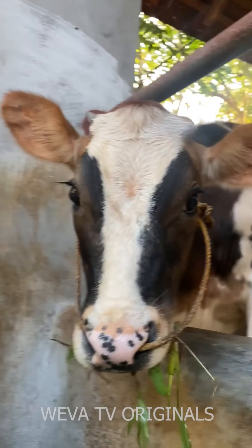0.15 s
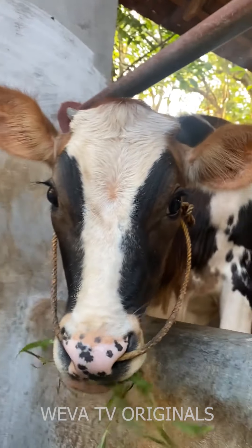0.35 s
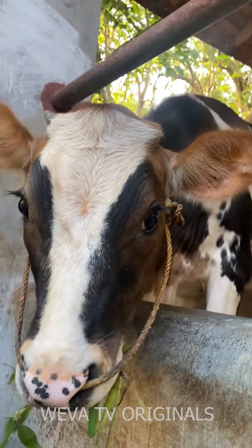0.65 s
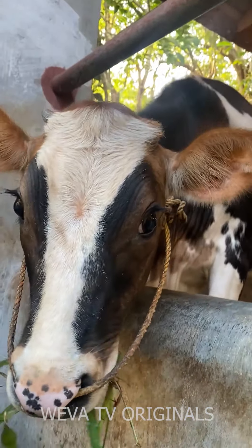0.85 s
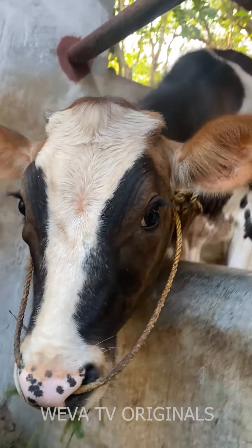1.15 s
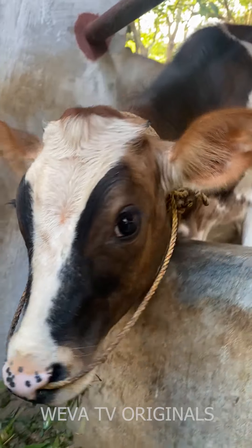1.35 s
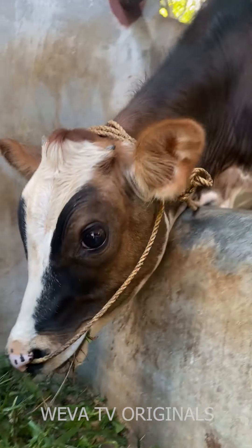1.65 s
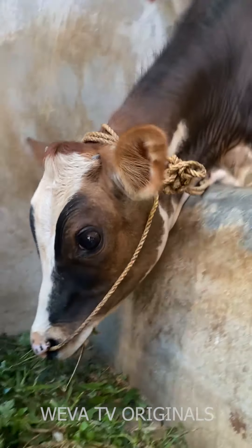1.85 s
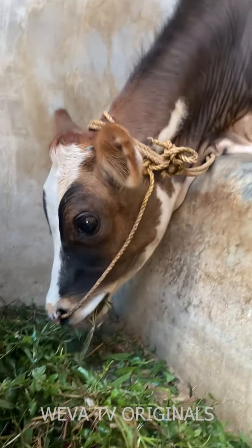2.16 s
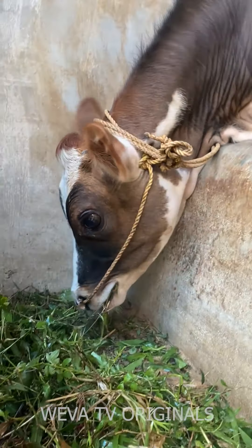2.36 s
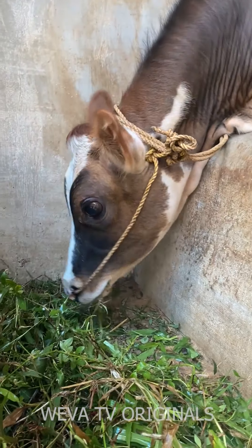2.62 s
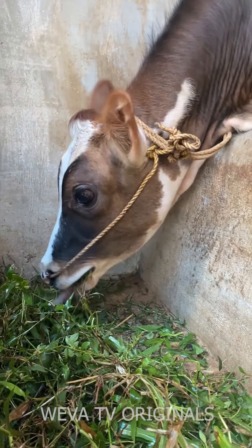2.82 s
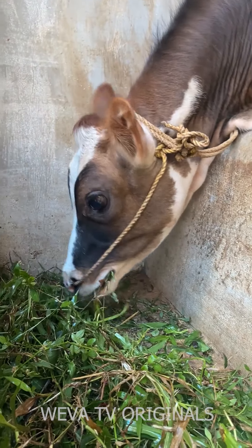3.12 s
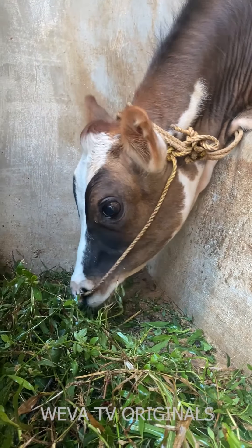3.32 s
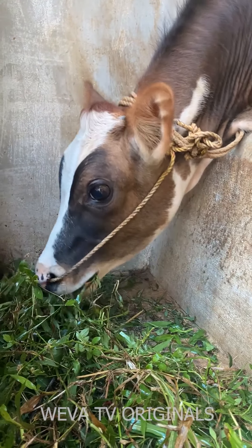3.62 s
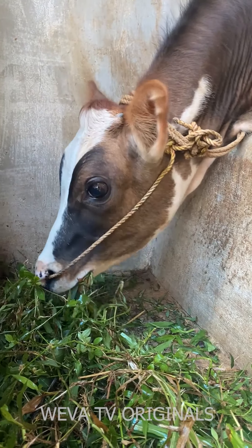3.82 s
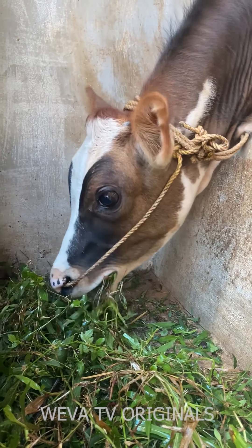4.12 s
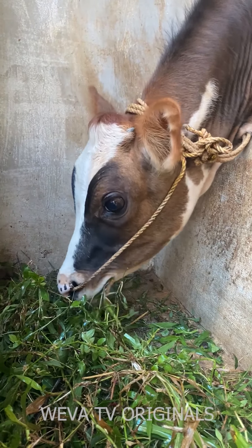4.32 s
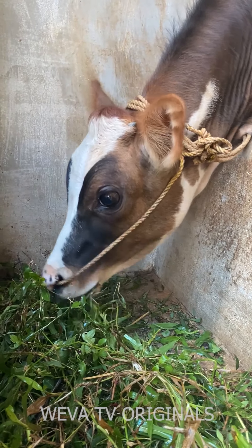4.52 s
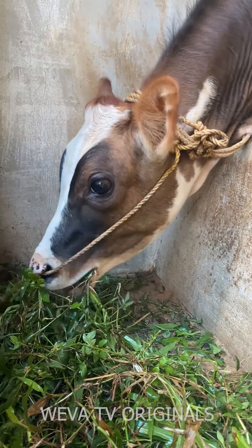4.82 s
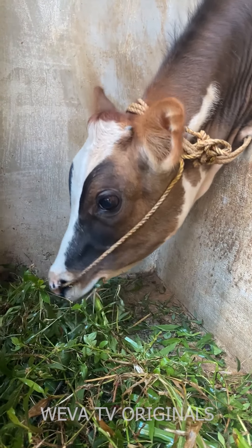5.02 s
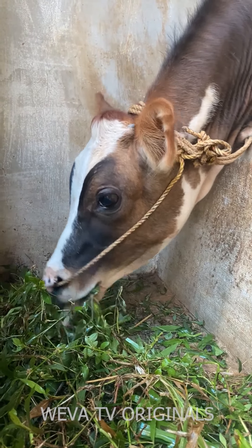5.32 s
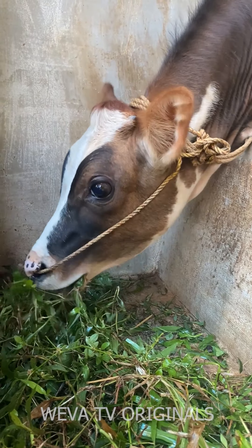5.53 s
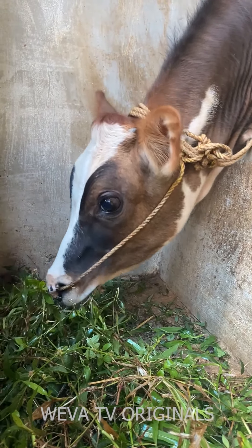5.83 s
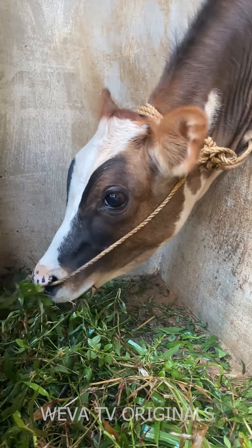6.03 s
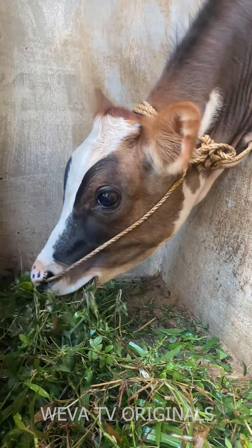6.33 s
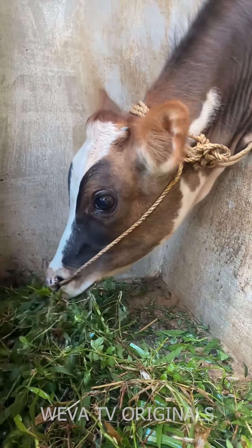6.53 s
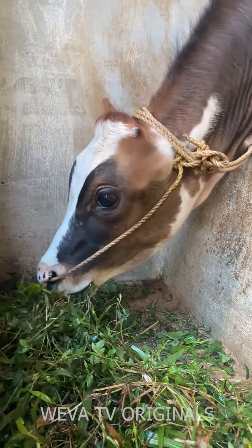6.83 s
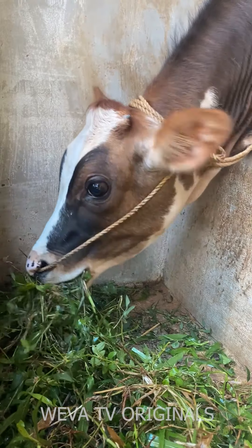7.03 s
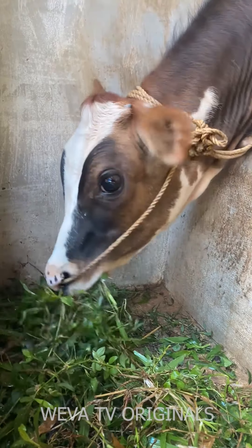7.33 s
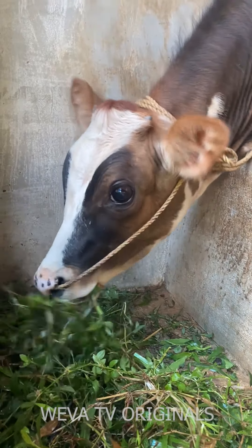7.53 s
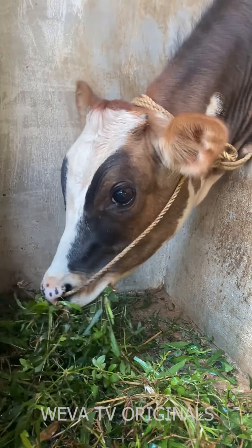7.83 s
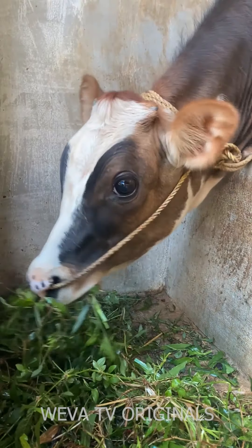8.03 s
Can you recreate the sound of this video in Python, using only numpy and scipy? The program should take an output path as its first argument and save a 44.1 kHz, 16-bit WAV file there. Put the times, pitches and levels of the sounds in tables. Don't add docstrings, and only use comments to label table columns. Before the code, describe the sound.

A calf grinds and tears fresh grass very close by, with wet crunches, stem snaps and leafy rustle over a low vehicle rumble that swells and fades.

```python
import sys
import numpy as np
from scipy import signal
from scipy.fft import rfft, irfft, next_fast_len
from scipy.io import wavfile
from scipy.ndimage import uniform_filter1d

SR = 44100
rng = np.random.default_rng(int(sys.argv[2]) if len(sys.argv) > 2 else 0)


def generate_wav(signal):
    frames = np.transpose(np.atleast_2d(signal))
    scaled = np.clip(frames, -1, 1) * 32767
    pcm = np.round(scaled).astype(np.int16)
    wavfile.write(sys.argv[1], SR, pcm)


def volts_from_decibels(level):
    exponent = np.asarray(level, float) / 20
    return 10 ** exponent


N = 359856


def evened(x):
    return x / np.sqrt(np.mean(x ** 2) + 1e-20)


def read(points, hz):
    f, value = np.transpose(points)
    return np.interp(np.log(hz + 1), np.log(f + 1), value)


def curve(rows, count=1):
    rows = np.array(rows)
    return np.interp(np.arange(N) / SR, rows[:, 0], rows[:, count])


def add(mix, s, sound):
    part = mix[round(s * SR):][:len(sound)]
    part += sound[:len(part)]


def sweep(hz):
    return np.sin(2 * np.pi * np.cumsum(hz) / SR)


# (frequency [Hz], phase [rad])
PORT_LEAD = [(0, 0), (300, 0), (860, -.4), (1460, .5), (1980, .1), (2760, .9), (3960, .9), (4910, 1.6),
             (5600, 1.6), (7900, 2.3), (10000, 3.14), (12000, 3.9), (15900, 5.3)]


def colour(x, points, turn=0):
    size = next_fast_len(N + 4096)
    hz = np.fft.rfftfreq(size, 1 / SR)
    response = volts_from_decibels(read(points, hz)) * np.exp(1j * turn * read(PORT_LEAD, hz))
    return irfft(rfft(x, size) * response, size)[..., :N]


def ring(x, hz, width):
    return signal.lfilter(*signal.iirpeak(hz, hz / width, SR), x)


def resonate(x, hz, width):
    turn = np.exp(2j * np.pi * np.cumsum(hz * np.ones(len(x))) / SR)
    r = np.exp(-np.pi * width / SR)
    return 2 * (turn * signal.lfilter([1 - r], [1, -r], x / turn)).real


def drift(per_s):
    knots = rng.standard_normal(1200)
    return np.interp(np.arange(N) / SR * per_s, np.arange(1200), knots)


def crackle(per_s, spread_db, smear_s, clump_db):
    size = volts_from_decibels(spread_db * np.minimum(rng.exponential(1, N), 5) + clump_db * drift(40))
    clicks = size * (rng.random(N) < per_s / SR)
    puff = signal.lfilter([1], [1, -np.exp(-1 / (smear_s * SR))], clicks ** 2)
    return evened(np.sqrt(puff) * rng.standard_normal(N))


def strokes(rows, peaks_db, least_s, share, roundness, rest_db):
    t = np.arange(0, N / SR + .01, .002)
    late = t - rows[:, :1]
    build = np.maximum(rows[:, 1:2], .02)
    span = np.where(late < 0, build, least_s + share * build)
    power = volts_from_decibels(peaks_db[:, None] - 20 * (abs(late) / span) ** roundness) ** 2
    return np.interp(np.arange(N) / SR, t, np.sqrt(power.sum(0) + volts_from_decibels(rest_db) ** 2))


def thuds(rows, gain_db, t60, rise_s, length=2600):
    out, t = np.zeros(N), np.arange(length) / SR
    for s, db, hz in rows:
        decay = volts_from_decibels(db + gain_db - 60 * t / t60)
        add(out, s, decay * np.sin(2 * np.pi * hz * t) * np.minimum(t / rise_s, 1))
    return out


def hisses(rows, gain_db, t60, hz, width):
    out, t = np.zeros(N), np.arange(2600) / SR
    for s, db in rows:
        noise = rng.standard_normal(len(t))
        add(out, s, volts_from_decibels(db + gain_db - 60 * t / t60) * evened(ring(ring(noise, hz, width), hz, width)))
    return out


# (peak time [s], build-up [s], grinding level [dB], stem crunch re grinding [dB])
BITES = [(0.078, 0.16, -42.5, -10.5), (0.48, 0.23, -57.5, -1.5), (0.708, 0.14, -46.5, -6),
         (1.001, 0.052, -54, -20), (1.261, 0.54, -53, 0), (1.58, 0.21, -54, -4), (1.82, 0.17, -44, -9.5),
         (2.2, 0.39, -49, -7.5), (2.339, 0.036, -39.5, -16.5), (2.511, 0.28, -48.0, -8),
         (2.811, 0.14, -48, -11), (3.06, 0.13, -48.5, -7.5), (3.289, 0.25, -46, -7.5),
         (3.462, 0.08, -50.5, -7), (3.8, 0.93, -58, -35), (4.14, 0.058, -50.5, -2.5),
         (4.394, 0.25, -41.5, -7), (4.789, 0.31, -54, -2), (5.092, 0.16, -42, -11),
         (5.31, 0.097, -45.5, -9), (5.39, 1, -56, -33), (6.0, 0.19, -56.5, -1), (6.37, 0.31, -54.5, -1.5),
         (6.46, 0.077, -50.5, -0.5), (6.579, 0.041, -51, -2.5), (7.03, 0.71, -53, -4),
         (7.27, 0.085, -50, 0), (7.782, 0.55, -55.5, -0.5), (7.955, 0.073, -46.5, -3.5),
         (8.23, 0.14, -40, -1.5)]


def bite_gain(crunch, rest_db):
    rows = np.array(BITES)
    peaks_db = rows[:, 2] + crunch * rows[:, 3]
    return strokes(rows, peaks_db, least_s=0.012, share=0.9, roundness=1.66, rest_db=rest_db)


# (frequency [Hz], width [Hz], level [dB])
JAW_MODES = [(240, 107, -0.5), (330.6, 12.9, 1), (420, 73, -4.5), (492, 3.3, -3.5), (546, 114, -0.5),
             (609.4, 58, -0.5), (635.7, 18.6, -3.5), (967, 11, -5)]
# (time [s], peak level [dB], frequency [Hz])
KNOCKS = [(0.07, -28, 312), (0.495, -32, 543), (0.995, -30.5, 297), (1.289, -25.5, 575), (1.295, -33, 280),
          (1.721, -25.5, 426), (1.788, -25.5, 368), (2.127, -33.5, 518), (2.296, -33.5, 600),
          (2.309, -27, 585), (2.34, -39, 600), (2.424, -32.5, 427), (2.501, -31.5, 352), (2.815, -37, 610),
          (3.203, -32.5, 420), (3.305, -33, 563), (3.438, -31.5, 614), (4.341, -24, 403), (4.414, -23, 333),
          (4.724, -35, 466), (5.003, -29, 356), (5.264, -28.5, 483), (6.014, -33, 618), (7.956, -30, 416)]


def molars():
    slips = crackle(per_s=280, spread_db=2.5, smear_s=0.0041, clump_db=-1.0)
    modes = sum((-1) ** k * volts_from_decibels(db) * evened(ring(slips, hz, width))
                for k, (hz, width, db) in enumerate(JAW_MODES))
    mouth_hz = uniform_filter1d(curve(KNOCKS, count=2), size=900)
    body = 1.64 * evened(modes) + 0.29 * evened(resonate(slips, mouth_hz, 100))
    body = colour(body, [(170, -6.0), (260, 2.0), (680, 2.0), (850, -7), (1500, -18.5), (20000, -21)])
    return volts_from_decibels(-0.5) * bite_gain(crunch=0, rest_db=-68) * evened(body)


def knocks():
    return thuds(KNOCKS, gain_db=-3.5, t60=0.06, rise_s=0.0027)


# (time [s], peak level [dB], frequency [Hz])
TAPS = [(0.121, -32, 267), (0.594, -36, 481), (0.666, -37, 528), (0.694, -31.5, 494), (0.804, -32, 500),
        (1.243, -36, 504), (1.517, -37, 341), (1.569, -33, 338), (1.626, -38.5, 438), (1.663, -37, 430),
        (1.814, -32.5, 407), (1.836, -35.5, 445), (1.885, -30, 408), (2.187, -37.5, 277),
        (3.012, -43.5, 456), (3.232, -32.5, 321), (4.277, -30, 465), (4.316, -25.5, 332), (4.449, -38, 472),
        (4.773, -33, 482), (4.828, -35.5, 571), (5.06, -37.5, 563), (5.078, -26, 328), (5.44, -45, 335),
        (5.529, -39, 540), (6.09, -39.5, 574), (6.354, -34.5, 332), (6.579, -37, 393), (7.197, -37.5, 538),
        (7.226, -48, 558), (7.251, -30.5, 638), (7.267, -37, 617)]


def taps():
    return thuds(TAPS, gain_db=-5.0, t60=0.079, rise_s=0.0025)


# (peak time [s], build-up [s], rustle level [dB])
PULLS = [(0.13, 0.017, -57.5), (0.33, 0.1, -64), (0.79, 0.27, -66.5), (1.03, 0.28, -66), (1.33, 0.18, -58),
         (1.65, 0.078, -65.5), (1.91, 0.073, -60.5), (2.26, 0.075, -63), (2.58, 1, -67.5),
         (2.97, 0.92, -68), (3.3, 0.52, -61.5), (3.601, 0.23, -59.5), (3.878, 0.51, -57),
         (4.17, 0.34, -60.5), (4.38, 0.12, -69), (4.7, 1, -61.5), (5.1, 0.46, -63), (5.492, 0.16, -56.5),
         (5.7, 0.26, -59), (6.02, 0.14, -68), (6.29, 0.28, -58.5), (6.54, 0.94, -57), (7.06, 0.54, -54),
         (7.32, 0.26, -59.5), (7.613, 0.29, -54.5), (7.9, 0.93, -61), (8.23, 0.27, -58.5)]


def pull_gain(gain_db, rest_db):
    rows = np.array(PULLS)
    return strokes(rows, rows[:, 2] + gain_db, least_s=0.035, share=0.14, roundness=2.17, rest_db=rest_db)


# (frequency [Hz], level [dB])
STEM_SPECTRUM = [(500, -15), (800, -7), (1200, -6), (1600, -1), (2300, -8.5), (3300, -6), (4300, -16.5),
                 (6000, -11.5), (16000, -16)]
# (frequency [Hz], width [Hz], level [dB])
TROUGH_MODES = [(1280, 34, -3), (1580, 150, -4.5), (2180, 200, 4.5), (3550, 340, -11), (4120, 500, 15),
                (4900, 80, -32)]


def stems():
    crunch = crackle(per_s=1400, spread_db=2.4, smear_s=.001, clump_db=2.0)
    juice = sum(resonate(crunch, hz * (1 + .15 * drift(9)), 120) for hz in (1000, 2500, 5200))
    trough = sum(volts_from_decibels(db) * evened(ring(crunch, hz, width)) for hz, width, db in TROUGH_MODES)
    sound = colour(crunch + 0.4 * evened(juice) + 0.35 * evened(trough), STEM_SPECTRUM)
    gain = np.hypot(bite_gain(crunch=1, rest_db=-80), pull_gain(gain_db=-2.5, rest_db=-80))
    return volts_from_decibels(0.5) * gain * evened(sound)


# (time [s], peak level [dB], ring [Hz], bright crack level [dB])
SNAPS = [(0.013, -37, 1184, -62), (0.07, -43, 2500, -65), (0.115, -35, 1305, -41), (0.14, -32, 1050, -59),
         (0.6, -40, 1790, -74), (0.69, -41.5, 3480, -66), (0.752, -33, 1275, -73),
         (0.804, -29, 1865, -49.5), (1.093, -43.5, 2050, -85), (1.244, -39, 1330, -44),
         (1.289, -25.5, 1015, -53), (1.624, -38, 1255, -55), (2.239, -41, 1230, -49),
         (2.175, -41, 2140, -66), (2.499, -39.5, 2970, -70), (2.518, -35, 2860, -73),
         (2.737, -38, 705, -76), (3.07, -44.5, 2700, -67), (3.224, -38.5, 3480, -63),
         (3.258, -40, 3200, -65), (3.301, -31.5, 1900, -44), (3.338, -38.5, 4280, -63),
         (4.334, -39.5, 1860, -63), (4.343, -35.5, 2830, -62), (4.378, -35, 4730, -41),
         (4.415, -32.5, 880, -43.5), (4.723, -38, 940, -53), (5.049, -40.5, 2910, -67),
         (5.113, -41, 3620, -63), (5.083, -35.5, 4000, -70), (6.015, -38.5, 940, -67),
         (6.451, -38.5, 1180, -51), (7.252, -39.5, 940, -71), (7.306, -33.5, 1680, -59),
         (7.428, -41, 1330, -62), (7.919, -39, 2370, -78), (7.95, -24, 1134, -38), (8.122, -37, 820, -71)]


def snaps():
    out, t = np.zeros(N), np.arange(2600) / SR
    for s, db, hz, crack_db in SNAPS:
        noise = rng.standard_normal(len(t))
        ping = volts_from_decibels(db - 6.5 - 60 * t / .036) * np.sin(2 * np.pi * hz * t)
        decay = volts_from_decibels(-60 * t / .026) + .25 * volts_from_decibels(-60 * t / .08)
        burst = volts_from_decibels(db - 8) * evened(ring(noise, 1.1 * hz, 2000)) * decay
        crack = volts_from_decibels(crack_db + 6.0 - 60 * t / 0.035) * np.diff(noise, prepend=0)
        add(out, s, (ping + burst + crack) * np.minimum(t / 0.0003, 1))
    return out


# (time [s], peak level [dB], ring [Hz])
POPS = [(0.02, -30, 1400), (0.045, -34.5, 1240), (0.213, -45.5, 1330), (0.356, -45, 1500),
        (0.412, -40.5, 1040), (0.433, -40, 1590), (0.497, -39.5, 1280), (0.613, -41, 1150),
        (0.638, -35, 1340), (0.652, -42, 1450), (0.664, -36.5, 1390), (0.677, -39, 1360),
        (0.727, -45, 1063), (1.009, -42, 1640), (1.717, -36.5, 1235), (1.728, -40, 1930),
        (1.785, -43, 1800), (1.849, -43, 3140), (1.886, -33, 820), (1.917, -42.5, 2360), (2.129, -41, 2180),
        (2.169, -48, 2130), (2.34, -40, 1500), (2.52, -32.5, 1580), (2.658, -46, 4070), (3.018, -38, 1010),
        (3.224, -45.5, 1950), (3.458, -42, 1380), (4.1, -49, 4340), (4.113, -39, 2250), (4.512, -35, 874),
        (5.023, -43, 960), (5.044, -39, 1504), (5.081, -34, 957), (5.111, -45, 816), (5.163, -40, 1000),
        (5.439, -47, 920), (5.684, -47, 961), (5.684, -43, 2700), (6.312, -42, 1820), (6.421, -43, 1510),
        (6.489, -40, 1490), (6.51, -40, 1400), (6.553, -43, 1500), (6.58, -44.5, 880), (6.718, -39, 4330),
        (6.769, -47.5, 830), (7.213, -43, 1450), (7.225, -43, 1540), (7.253, -31, 1580), (7.278, -38, 1505),
        (7.306, -37.5, 1580), (7.39, -56.5, 1330), (7.427, -35, 1417), (7.484, -43.5, 1770),
        (7.529, -52, 1830), (7.843, -44, 1160), (8.132, -40, 2340)]


def pops():
    out, t = np.zeros(N), np.arange(2600) / SR
    for s, db, hz in POPS:
        puff = evened(ring(rng.standard_normal(len(t)), hz, 800))
        tone = np.sin(2 * np.pi * hz * t) + .6 * puff
        add(out, s, volts_from_decibels(db - 3 - 60 * t / .028) * tone * np.minimum(t / 0.0014, 1))
    return out


# (start [s], length [s], level # [dB], ring [Hz], width
# [Hz])
RASPS = [(0.61, 0.12, -51, 1350, 694), (1.003, 0.034, -53, 5200, 1500), (1.089, 0.04, -50.5, 2390, 900),
         (1.304, 0.011, -37.5, 3170, 151), (2.12, 0.08, -61, 2200, 500), (2.238, .045, -59.5, 2480, 500),
         (1.718, 0.032, -58, 1280, 100), (3.011, 0.041, -56.5, 1013, 90), (3.144, .035, -61, 1540, 120),
         (3.293, 0.023, -42.5, 4400, 1800), (2.797, .06, -52, 600, 350), (3.299, 0.017, -51, 3200, 300),
         (3.472, .014, -53.5, 4100, 1200), (4.099, 0.093, -51, 4400, 5000),
         (4.116, 0.054, -53.5, 1460, 150), (4.594, .05, -55, 920, 199), (4.714, .15, -57, 914, 150),
         (4.714, .16, -49, 498, 150), (2.306, 0.071, -56, 1216, 110), (5.905, .03, -54.5, 750, 600),
         (5.247, 0.15, -51, 524, 300), (5.416, 0.089, -52.5, 335, 40.7), (7.647, 0.077, -58, 995, 80),
         (7.658, 0.22, -53, 494, 60), (7.717, .075, -61.5, 1750, 100), (7.948, .018, -45.5, 2380, 600),
         (7.953, 0.047, -50, 1150, 200), (7.945, 0.017, -41, 4370, 3000)]


def rasps():
    out = np.zeros(N)
    grit = crackle(per_s=1500, spread_db=2.0, smear_s=.001, clump_db=1.0)
    for s, length, db, hz, width in RASPS:
        part = grit[round(s * SR):][:round(length * SR)]
        drag = evened(ring(ring(part, hz, width), hz, width))
        add(out, s, volts_from_decibels(db) * drag * signal.windows.tukey(len(part), .3))
    return out


# (time [s], level [dB])
SLIPS = [
    (4.247, -46.5),
    (4.28, -40.5),
    (4.296, -40),
    (4.313, -43),
    (4.347, -43),
    (4.375, -37.5),
    (4.391, -42),
    (4.407, -37.5),
    (4.412, -36.5),
]


def squeak():
    out, t = np.zeros(N), np.arange(1200) / SR
    for s, db in SLIPS:
        ping_hz = 4330 * (1 + 0.018 * rng.standard_normal())
        tick = evened(ring(rng.standard_normal(len(t)), 3500, 6000))
        add(out, s, volts_from_decibels(db - 60 * t / 0.031) * (np.sin(2 * np.pi * ping_hz * t) + tick))
    return out


# (frequency [Hz], level [dB])
LEAF_SPECTRUM = [(1500, -22), (3000, -9), (4500, -3), (5500, 0), (7000, -.5), (8500, -2), (9500, -2),
                 (10500, -4), (13500, -3), (15500, -5.5)]


def leaves():
    ticks = crackle(per_s=2500, spread_db=3.0, smear_s=.001, clump_db=2.0)
    springs = crackle(per_s=45, spread_db=3.0, smear_s=.006, clump_db=0)
    rustle = evened(colour(ticks + 0.4 * springs, LEAF_SPECTRUM))
    return volts_from_decibels(7.5 + 3.0 * drift(12)) * pull_gain(gain_db=0, rest_db=-76) * rustle


# (time [s], peak level [dB])
LEAF_TICKS = [(0.0727, -50), (0.7158, -45.5), (1.009, -39.5), (1.322, -38.5), (1.884, -46), (1.9946, -50),
              (5.113, -43), (5.684, -44), (5.062, -45), (5.767, -50), (7.1222, -39), (7.4988, -45)]


def leaf_ticks():
    return hisses(LEAF_TICKS, gain_db=1.5, t60=.036, hz=6200, width=8000)


# (time [s], peak level [dB])
FLICKS = [(0.4239, -53), (0.7654, -51), (0.805, -49.5), (2.2206, -45), (2.378, -55), (2.4983, -53),
          (2.7187, -61), (2.7906, -57), (3.004, -50), (3.473, -57), (3.8026, -48), (4.1003, -47),
          (4.613, -54), (5.079, -55), (7.5118, -36.5)]


def flicks():
    return hisses(FLICKS, gain_db=2.5, t60=0.043, hz=14000, width=12000)


# (start [s], length [s], top pitch [Hz], level [dB], width [Hz])
BREATHS = [
    (0.238, 0.34, 1444, -69, 400),
    (0.867, 0.32, 1440, -66.5, 350),
    (2.295, 0.31, 1473, -68.5, 200),
    (2.797, 0.26, 1490, -71, 45),
    (3.4, 0.23, 1430, -66.5, 60),
    (4.094, 0.234, 1500, -69, 110),
    (4.62, 0.31, 1554, -69.5, 80),
    (5.811, 0.198, 1460, -68.5, 40),
]


def nostrils():
    out = np.zeros(N)
    for s, length, hz, db, width in BREATHS:
        u = np.arange(0, length, 1 / SR) / length
        pitch = hz * (1 - .15 * abs(2 * u - 1) ** 4 - .05 * (u - .5))
        air = resonate(resonate(rng.standard_normal(len(u)), pitch, width), pitch, width)
        whistle = evened(evened(air) + .7 * 150 / width * sweep(pitch))
        add(out, s, volts_from_decibels(db + 7.0 + 1.5 * u) * whistle * signal.windows.tukey(len(u), .3))
    return out


# (time [s], level [dB])
ENGINE_LEVEL = [
    (2.5, -48.5),
    (3.7, -49.5),
    (4.4, -43.5),
    (5, -39),
    (5.8, -46.5),
    (6.5, -44),
    (7.3, -48.5),
]
# (time [s], firing cycle [Hz])
ENGINE_SPEED = [
    (2.5, 16.1),
    (3.4, 16.3),
    (4.1, 16.8),
    (5.5, 16.5),
    (6.2, 15.6),
    (7.3, 14.7),
]
# (multiple of the cycle, level abreast [dB], change as the exhaust swings round [dB/s])
ENGINE_ORDERS = [(3, -24, 1), (4, -20.5, -3.5), (5, -3, 1), (7, -15.5, 6), (8, -1, -0.3), (10, -11.5, -3.5)]


def vehicle():
    t = np.arange(N) / SR
    turns = 2 * np.pi * np.cumsum(uniform_filter1d(curve(ENGINE_SPEED), size=SR // 4)) / SR
    fade = np.interp(t, [2.3, 2.7, 7.1, 7.5], [0, 1, 1, 0])
    drone = np.zeros(N)
    for order, db, swing_db in ENGINE_ORDERS:
        level_db = db + swing_db * (t - 4.7) + 3.3 * drift(8.7)
        drone += volts_from_decibels(level_db) * np.sin(order * turns + 0.62 * drift(5))
    return fade * volts_from_decibels(curve(ENGINE_LEVEL) + 2.0) * drone


# (time [s], frequency [Hz], level [dB])
IDLE = [
    (0, 40.56, -68),
    (2, 41, -45),
    (3.6, 45.1, -61),
    (4.4, 42.4, -68.5),
    (8.16, 43.1, -64),
]
# (time [s], frequency [Hz], level [dB])
PULL_AWAY = [
    (0.6, 86, -55.5),
    (0.85, 90.22, -40.5),
    (1.7, 96, -44),
    (2.3, 102, -52.5),
    (2.8, 104.3, -65.5),
]
# (time [s], frequency [Hz], level [dB])
FOLLOWER = [
    (6.7, 59.1, -80),
    (7.2, 58.3, -52),
    (8.16, 58.5, -44.5),
]


def far_motors():
    return sum(volts_from_decibels(curve(motor, count=2) + 3.3 * drift(2.2)) * sweep(curve(motor))
               for motor in (IDLE, PULL_AWAY, FOLLOWER))


# (time [s], peak level [dB], frequency [Hz])
BUMPS = [(1.088, -35.5, 79), (1.513, -40.5, 85.6), (1.716, -30, 98), (2.159, -39, 100.4), (2.298, -38, 99),
         (3.252, -36.5, 102.7), (4.5, -29.5, 88), (4.857, -26, 116.8), (5.473, -30.5, 131.5),
         (6.572, -35, 111.6), (7.005, -32.5, 104.5)]


def bumps():
    return thuds(BUMPS, gain_db=2.5, t60=0.16, rise_s=0.0028, length=6000)


# (time [s], level [dB])
TRAFFIC_LEVEL = [
    (0, -47),
    (1.2, -44.5),
    (2.4, -46),
    (3.4, -46.5),
    (4.7, -39.5),
    (5.6, -45.5),
    (8.16, -47.5),
]
# (frequency [Hz], level [dB])
ROAD_SPECTRUM = [(12, -48), (20, -17), (54, -7.5), (86, -2), (105, -2), (150, -9), (182, -1), (216, -5.5),
                 (242, -16.5), (300, -15.5), (390, -51), (660, -120)]


def traffic():
    wash = rng.standard_normal(N)
    hum = sum(resonate(wash, hz * (1 + .08 * drift(1.2)), 3) for hz in np.geomspace(38, 125, 6))
    road = evened(colour(wash + 0.9 * evened(hum), ROAD_SPECTRUM))
    return volts_from_decibels(curve(TRAFFIC_LEVEL) + 1.6 * drift(7.1)) * road


# (frequency [Hz], level [dB])
AIR_SPECTRUM = [(150, 10.5), (300, -13), (700, -14), (1500, -8), (4000, -23), (8000, -25.5), (16000, -28.5)]


def open_air():
    return volts_from_decibels(-54.5) * evened(colour(rng.standard_normal(N), AIR_SPECTRUM))


# (frequency [Hz], level [dB])
SCATTER_SPECTRUM = [(60, -38), (125, -27), (250, -22), (500, -6.5), (850, 0.5), (1250, 0), (1600, -3.5),
                    (2000, -8), (2700, -2.5), (6000, -7), (9800, -16), (12500, -7), (16000, -5)]


def shed(x):
    z = signal.stft(x, nperseg=512, noverlap=384)[2]
    z = z * np.exp(2j * np.pi * rng.random((2, *z.shape)))
    scattered = signal.istft(z, nperseg=512, noverlap=384)[1][:, :N]
    scattered = evened(scattered) * np.std(x)
    return colour(np.roll(scattered, 330, axis=1), SCATTER_SPECTRUM)


# (frequency [Hz], left minus right [dB])
PORT_TILT = [(60, 0), (150, -.4), (300, -1.5), (700, -3), (2400, -2.2), (5000, -.5), (8100, 0), (16000, 0)]


def scene():
    bed = molars() + stems() + leaves() + vehicle() + far_motors() + traffic() + open_air() + bumps()
    near = snaps() + knocks() + leaf_ticks() + squeak() + rasps() + pops() + taps() + flicks()
    half = np.array(PORT_TILT) * [1, .5]
    left = colour(bed + near, half, .5)
    right = colour(bed + near, half * [1, -1], -.5)
    nose = nostrils() * volts_from_decibels(np.array([[3.0], [-6.0]]))
    return np.array([left, right]) + shed(bed + near / 2) + nose


PLAIN = [.02, .74, 1.32, 3.3, 4.385, 4.43, 5.78, 7.13]


def thin_stereo(ports):
    start, edge_hz = 162, 15540
    pair = np.array([ports[0] + ports[1], ports[0] - ports[1]])
    hz, t, z = signal.stft(np.pad(pair, ((0, 0), (start, 0))), SR, nperseg=2048, noverlap=1024)
    z[:, hz > edge_hz] = 0
    power = (abs(z[:, :1024]) ** 2).reshape(2, 64, 16, -1).sum(2)
    sum_db, difference_db = 10 * np.log10(abs(uniform_filter1d(power, size=2)) + 1e-20)
    plain = abs(t[:, None] - start / SR - PLAIN).min(1) < .0117
    limit_db = difference_db - 7.2 + 0.9 * rng.standard_normal(sum_db.shape)
    weak = (sum_db < limit_db) & (sum_db < difference_db - 3) & ~plain
    z[0, :1024] *= np.where(np.repeat(weak, 16, 0), 1e-3, 1)
    z[:, 64:1024] *= np.repeat(rng.random((2, 240, len(t))) > .045, 4, 1)
    both, apart = signal.istft(z, SR, nperseg=2048, noverlap=1024)[1][:, start:start + N]
    return np.array([both + apart, both - apart]) / 2


def low_pass(x):
    return signal.sosfilt(signal.butter(12, 16390, fs=SR, output="sos"), x)


def record(dry):
    limited = .1 * np.tanh(dry / .1)
    mix = thin_stereo(limited)
    return low_pass(mix)


dry = scene()
out = record(dry)
generate_wav(out)
```